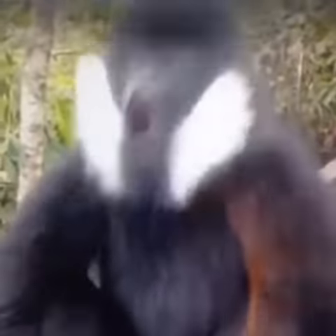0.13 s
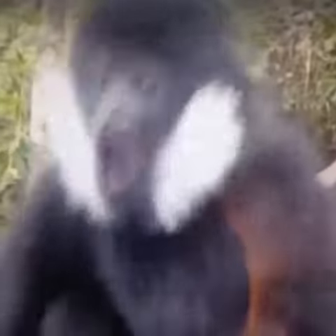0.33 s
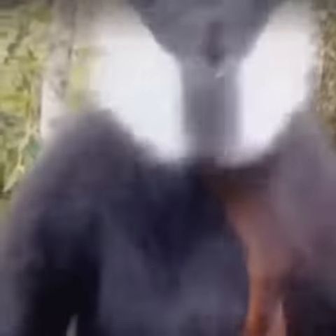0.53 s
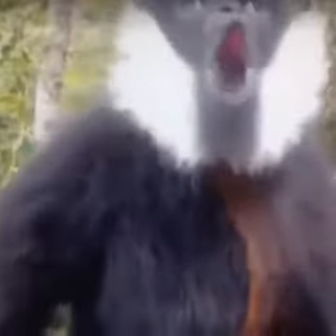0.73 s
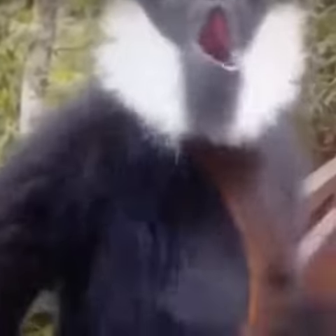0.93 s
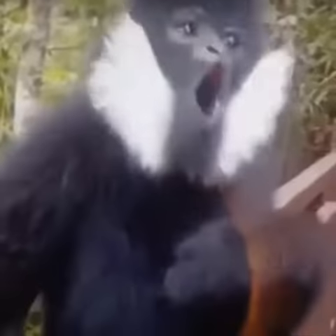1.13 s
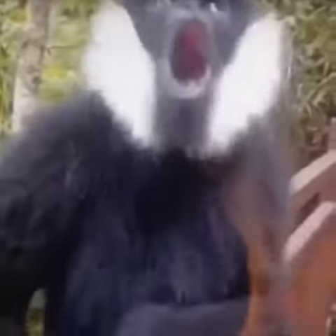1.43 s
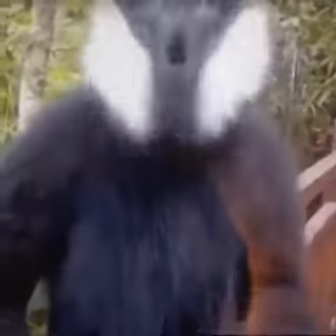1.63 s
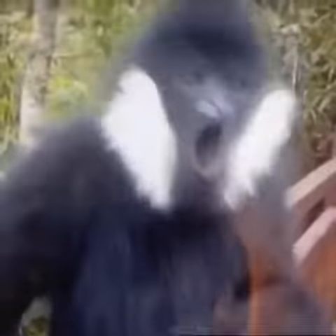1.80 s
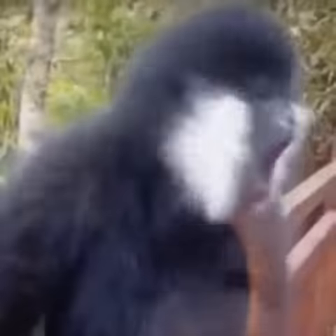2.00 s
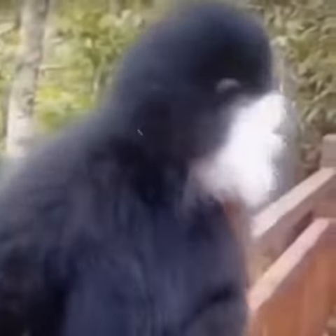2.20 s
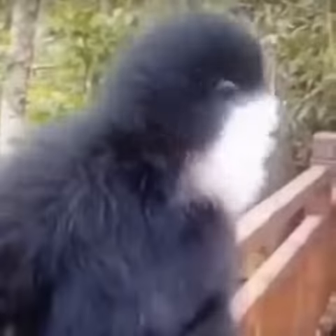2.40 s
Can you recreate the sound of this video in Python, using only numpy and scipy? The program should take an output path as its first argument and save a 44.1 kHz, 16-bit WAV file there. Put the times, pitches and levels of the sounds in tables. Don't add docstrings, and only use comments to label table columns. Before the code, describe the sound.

Four piercing, near-pure gibbon whoops sweep upward with rapid wavering, over quiet low hum and hiss

```python
import sys
import numpy as np
from scipy import signal
from scipy.fft import rfft, irfft
from scipy.io import wavfile
from scipy.ndimage import uniform_filter1d

SR = 44100
rng = np.random.default_rng(int(sys.argv[2]) if len(sys.argv) > 2 else 0)


def gain_from_db(level_db):
    decades = np.asarray(level_db, float) / 20
    return 10 ** decades


def generate_wav(sig):
    pcm = np.round(np.clip(np.atleast_2d(sig).T, -1, 1) * 32767).astype(np.int16)
    wavfile.write(sys.argv[1], SR, pcm)


N = 112455

# start_s, start_pitch_hz, start_effort_db, last_dip_effort_db, release_s
WHOOP_CALLS = [
    (.142, 842.3, -22.5, -15, 0.04922),
    (.752, 789.8, -17.5, -15.5, .005),
    (1.384, 843.9, -19, -20, .005),
    (1.985, 776.6, -24.5, -18, .005),
]
# crest_s, crest_pitch_hz, dip_s, dip_pitch_hz
WARBLES_FIRST = [(.178, 945, .2, 915), (.234, 990, .26, 945), (.294, 1178, .326, 1030),
                 (.364, 1410, .4, 1130), (.442, 1595, .478, 1210), (.519, 1740, .562, 1105)]
WARBLES_SECOND = [(.822, 862, .842, 866), (.88, 985, .912, 914), (.95, 1203, .985, 996),
                  (1.028, 1410, 1.066, 1065), (1.108, 1568, 1.148, 1143), (1.192, 1735, 1.237, 960)]
WARBLES_THIRD = [(1.426, 1016, 1.452, 957), (1.486, 1172, 1.52, 1035), (1.558, 1460, 1.596, 1156),
                 (1.636, 1625, 1.674, 1222), (1.716, 1716, 1.754, 1270), (1.796, 1798, 1.838, 930)]
WARBLES_FOURTH = [(2.046, 1037, 2.07, 987), (2.104, 1262, 2.138, 1100), (2.177, 1560, 2.216, 1190),
                  (2.256, 1722, 2.296, 1207), (2.337, 1774, 2.38, 1126), (2.422, 1700, 2.456, 1230)]
CREST_EFFORTS_DB = [
    [-6, -5, -5, -4, -1.5, 0],
    [-17.5, -1, -1, -1, -0.5, -3],
    [-1.5, 1, 0.5, -1.5, -0.5, 0.5],
    [3.5, 0, 0, 0.5, 0.5, -6.5],
]
FOLD_HARMONICS_DB = [0, -1.5, -2.5, -9, -9, -21, -23, -25]
# throat_scale_ratio, second_harmonic_fade_db, breath_start_db, breath_rise_db,
# higher_harmonics_fade_db
MOUTH_SHAPES = [(0.982, -4, -19, 13.5, -2), (0.992, -11.5, -19.5, 14.5, -3.5), (1.005, -7, -14, 10.5, -4.5),
                (1.04, -8.5, -16, 7.5, -12.5)]
# frequency_hz, gain_db
BREATH_GAIN = [(900, -30), (2300, -29.5), (3000, 13), (4000, -1.5), (5200, 5.5), (6200, -2), (7800, 8.5)]
# frequency_hz, gain_db
THROAT_LOW_GAIN = [(600, -3), (900, -8.5), (1025, -23), (1160, -3), (1480, -10), (1780, 1.5),
                   (2080, -0.4755), (2480, -17.5)]
# frequency_hz, gain_db
THROAT_HIGH_GAIN = [(2700, -26), (3200, -36.5), (3650, -28), (4200, -22.5), (4950, -20), (5600, -30.5),
                    (7700, -29.5), (8050, -51.5)]
VALLEY_GAINS_DB = [3, -13, -9.5, 2.5]
# delay_s, level_db
ECHO_TAPS = [(.0031, -18), (.0125, -21), (.022, -13), (.044, -20)]
# start_s, level_db, pitch_hz, t60_s
KNOCKS = [
    (.546, -69.5, 503, 0.0173),
    (1.227, -79, 1696, .012),
    (1.827, -67, 1497, 0.015),
    (2.285, -65, 386.9, 0.0744),
    (2.45, -77, 1700, .012),
]
# frequency_hz, rms_db, waver_width_hz, steady_share_ratio
HUM_LINES = [(25.47, -86, 17, .05), (46.379, -60.5, 5.3, 0.85), (72.76, -79.5, 21, 0.3),
             (86.181, -70, 8.9, .2), (100.51, -73, 5, 0.7), (131.83, -91, 12, 0.1),
             (215.56, -85, 18.88, .3), (330.35, -84.5, 28, 0)]
# frequency_hz, density_db_per_hz
HISS_SPECTRUM = [(76, -31), (130, -1), (155, -8), (533, -11.5), (987, -20), (1280, -8), (2940, -20.5),
                 (15000, -28.5)]


def read(points, hz):
    f, value = np.transpose(points)
    return np.interp(np.log(hz + 1), np.log(f + 1), value)


def evened(x):
    return x / np.sqrt(np.mean(x ** 2) + 1e-20)


def drift(hz, size):
    f = np.fft.rfftfreq(size, 1 / SR)
    spectrum = rfft(rng.standard_normal(size)) / (1 + (f / hz) ** 4)
    return evened(irfft(spectrum, size))


def add(mix, s, sound):
    part = mix[round(s * SR):][:len(sound)]
    part += sound[:len(part)]


def coloured(x, points, scale=1):
    hz = np.linspace(0, SR / 2, 2049)
    taps = signal.firwin2(2047, hz, gain_from_db(read(points, hz / scale)), fs=SR)
    return signal.oaconvolve(x, taps, "same")


def gibbon():
    valley_hz, valley_width_hz = 1523, 140
    all_warbles = [WARBLES_FIRST, WARBLES_SECOND, WARBLES_THIRD, WARBLES_FOURTH]
    throat = list(THROAT_LOW_GAIN) + list(THROAT_HIGH_GAIN)
    out = np.zeros(N)
    for call, warbles, crest_db, mouth, valley_db in zip(
            WHOOP_CALLS, all_warbles, CREST_EFFORTS_DB, MOUTH_SHAPES, VALLEY_GAINS_DB):
        throat_scale, *voice_settings = mouth
        voice = np.zeros(N)
        add(voice, call[0], whoop(call, warbles, crest_db, *voice_settings))
        valley = [(valley_hz - valley_width_hz, 0), (valley_hz, valley_db), (valley_hz + valley_width_hz, 0)]
        out += coloured(coloured(voice, valley), throat, throat_scale)
    return out


def whoop(call, warbles, crest_db, fade_db, breath_db, rise_db, upper_db):
    voice_db, dip_db, attack_s = -42.5, -1.2032, 0.01003
    start, start_hz, start_db, end_db, release_s = call
    rows = np.array(warbles, float)
    at = np.r_[start, rows[:, ::2].ravel()]
    pitch_hz = np.r_[start_hz, rows[:, 1::2].ravel()]
    crest_db = np.array(crest_db)
    dips_db = np.r_[(crest_db[:-1] + crest_db[1:]) / 2 + dip_db, end_db]
    marks_db = np.r_[start_db, np.c_[crest_db, dips_db].ravel()]

    t = np.arange(start, at[-1] + release_s, 1 / SR)
    gone = (t - start) / (t[-1] - start)
    effort_db = np.interp(t, at, marks_db)
    cycles = np.cumsum(swung_pitch(t, at, pitch_hz)) / SR
    voice = folds(cycles, gone, fade_db, upper_db) + breath(cycles, gone, breath_db, rise_db)
    attack = np.clip((t - start) / attack_s, 0, 1)
    release = np.clip((t[-1] - t) / release_s, 0, 1)
    return attack * release * gain_from_db(voice_db + effort_db) * np.sqrt(2) * voice


def swung_pitch(t, at, pitch_hz):
    overshoot, straight, jitter = 0.030968, 0.16742, 0.0023
    pitch_hz = pitch_hz - overshoot * np.r_[0, np.diff(np.diff(pitch_hz)), 0]
    index = np.arange(len(at))
    u = np.interp(t, at, index)
    turn = np.floor(u) + .5 - .5 * np.cos(np.pi * (u % 1))
    turn = straight * u + (1 - straight) * turn
    turn = np.where(u < 1, np.sin(np.pi / 2 * u), turn)
    return np.interp(turn, index, pitch_hz) * (1 + jitter * drift(130, len(t)))


def folds(cycles, gone, fade_db, upper_db):
    shimmer_db, patchy_db = 1.887, .5
    out = np.zeros(len(cycles))
    for k, db in enumerate(FOLD_HARMONICS_DB):
        change_db = 0 if k == 0 else fade_db if k == 1 else upper_db
        flicker_db = (shimmer_db + patchy_db * k) * drift(37, len(cycles))
        out += gain_from_db(db + change_db * gone + flicker_db) * np.cos(2 * np.pi * (k + 1) * cycles)
    return out


def breath(cycles, gone, breath_db, rise_db):
    rise_share, flicker_db = .4, 1.3
    puffs = (1.1248 + np.cos(2 * np.pi * cycles)) * rng.standard_normal(len(cycles))
    level_db = breath_db + rise_db * np.minimum(gone / rise_share, 1)
    level_db = level_db + flicker_db * drift(28, len(cycles))
    return coloured(puffs, BREATH_GAIN) * gain_from_db(level_db)


def place(x):
    near_db, near_t60_s, far_db, far_t60_s = -15.5, 0.16032, -25, 0.8728
    tail_top_hz, onset_s = 3240, 0.0033
    t = np.arange(SR) / SR
    near, far = rng.standard_normal((2, SR)) * np.clip(t / onset_s, 0, 1)
    near = near * gain_from_db(-60 * t / near_t60_s)
    far = far * gain_from_db(-60 * t / far_t60_s)
    tail = gain_from_db(near_db) * near / np.linalg.norm(near) + gain_from_db(far_db) * far / np.linalg.norm(far)
    tail = signal.lfilter(*signal.butter(1, tail_top_hz, fs=SR), tail) * np.sqrt(2)
    for s, db in ECHO_TAPS:
        tail[round(s * SR)] += gain_from_db(db)
    return x + signal.fftconvolve(x, tail)[:N]


def earlier():
    level_db, centre_hz, half_width_hz, t60_s = -68, 1446.3, 263.7, 0.903
    band_hz = [centre_hz - half_width_hz, centre_hz + half_width_hz]
    sos = signal.butter(3, band_hz, "band", fs=SR, output="sos")
    wash = signal.sosfilt(sos, rng.standard_normal(N))
    return evened(wash) * gain_from_db(level_db - 60 * np.arange(N) / SR / t60_s)


def knocks():
    attack_s = 0.0026
    out, t = np.zeros(N), np.arange(2000) / SR
    for s, db, hz, t60_s in KNOCKS:
        band = signal.butter(2, [.65 * hz, 2.5 * hz], "band", fs=SR)
        puff = evened(signal.lfilter(*band, rng.standard_normal(len(t))))
        add(out, s, puff * np.clip(t / attack_s, 0, 1) * gain_from_db(db - 60 * t / t60_s))
    return out


def hum():
    t, out = np.arange(N) / SR, np.zeros(N)
    for hz, db, width_hz, steady in HUM_LINES:
        share = np.clip(steady, 0, 1)
        waver = drift(width_hz, N) + 1j * drift(width_hz, N)
        envelope = np.sqrt(share) + np.sqrt((1 - share) / 2) * waver
        carrier = np.exp(2j * np.pi * (hz * t + rng.random()))
        out += gain_from_db(db) * np.sqrt(2) * (envelope * carrier).real
    return out


def hiss():
    level_db, patch_db = -71.5, 2
    frames, hz = N // 256 + 5, np.fft.rfftfreq(1024, 1 / SR)
    a, b, patches = rng.standard_normal((frames, 513, 3)).T
    patches = uniform_filter1d(patches, size=10, axis=0)
    patches = evened(uniform_filter1d(patches, size=12, axis=1))
    z = (a + 1j * b) * gain_from_db(read(HISS_SPECTRUM, hz)[:, None] + patch_db * patches)
    noise = signal.istft(z, nperseg=1024, noverlap=768)[1][:N]
    return gain_from_db(level_db) * evened(noise)


def scene():
    near_sources = place(gibbon() + knocks())
    return (near_sources + earlier() + hum() + hiss())[None]


def low_pass(x):
    return signal.sosfilt(signal.butter(12, 15170, fs=SR, output="sos"), x)


def record(dry):
    return low_pass(dry)


dry = scene()
out = record(dry)
generate_wav(out)
```